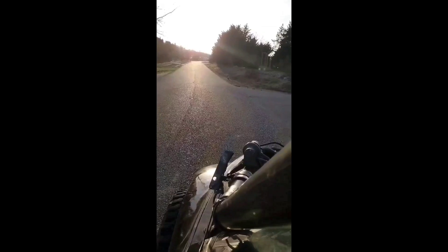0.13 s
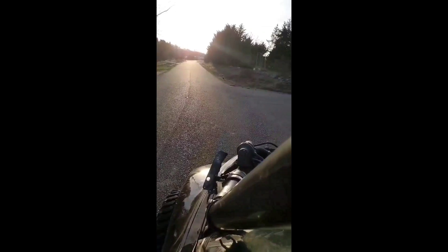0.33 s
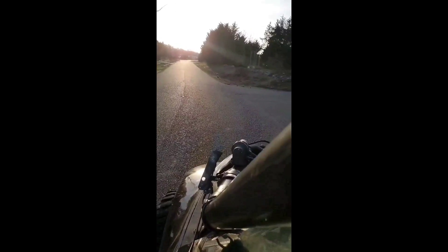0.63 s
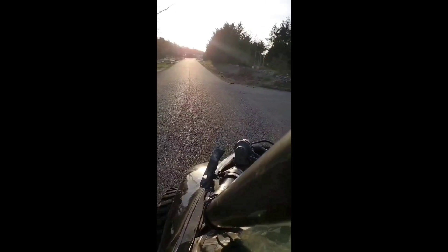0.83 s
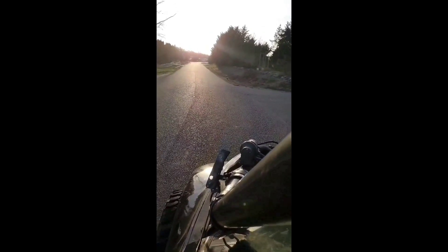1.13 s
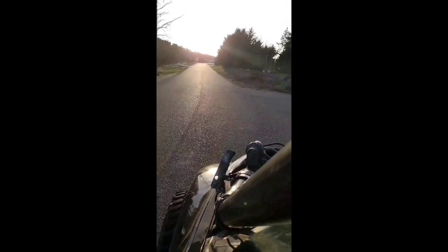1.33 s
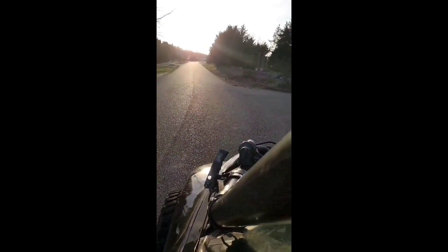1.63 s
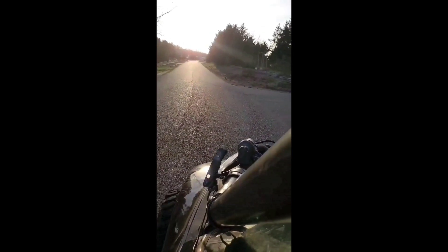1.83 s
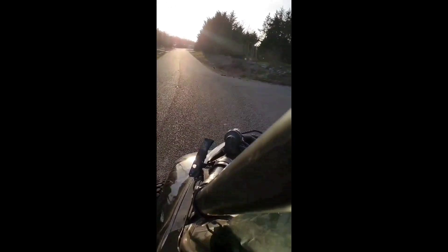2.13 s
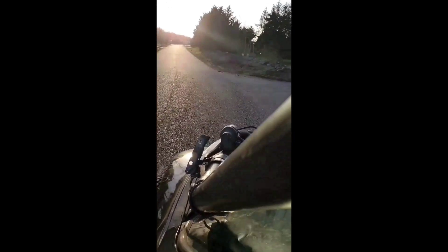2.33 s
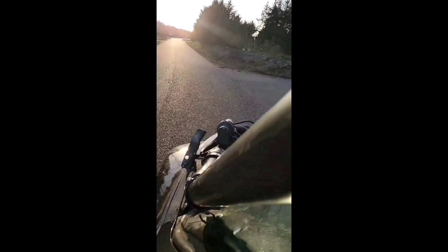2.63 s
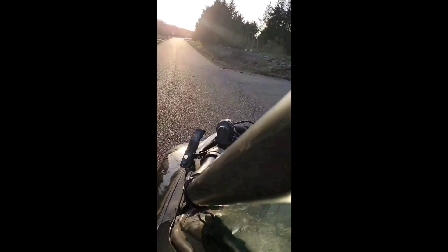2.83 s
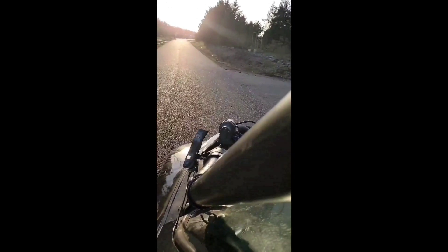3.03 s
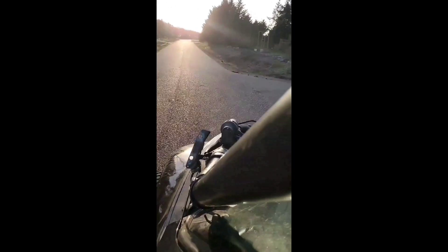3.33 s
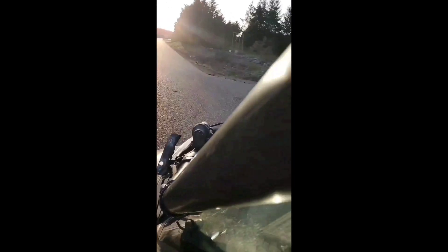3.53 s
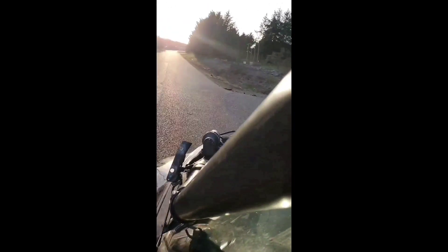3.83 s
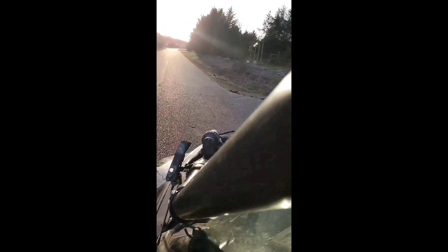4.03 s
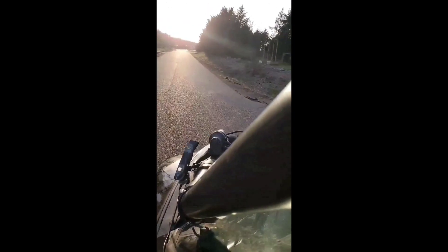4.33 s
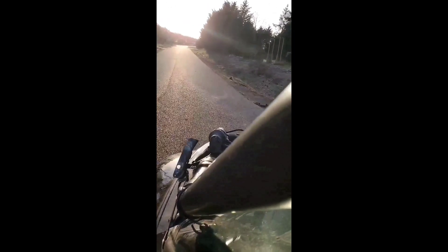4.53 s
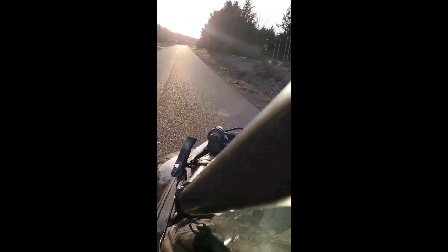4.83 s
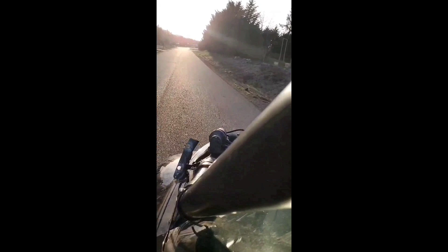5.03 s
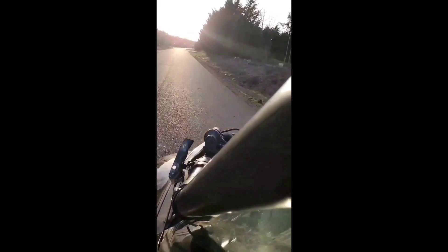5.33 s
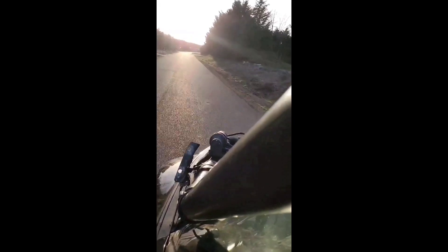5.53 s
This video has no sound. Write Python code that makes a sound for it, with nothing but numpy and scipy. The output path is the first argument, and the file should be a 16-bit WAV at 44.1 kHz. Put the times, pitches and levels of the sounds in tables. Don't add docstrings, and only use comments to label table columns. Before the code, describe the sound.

A close, dry outdoor microphone beside a small turbocharged engine. Quiet, slightly limping idle thuds give way to a sharp throttle opening, then uneven revs with spitting gas and tinny panel buzz. A faint whine slides steadily upward throughout. In the last second and a half the exhaust tightens into a rising drone, hiss dips briefly and returns, ending at full pull.

```python
import sys
import numpy as np
from scipy import signal
from scipy.fft import rfft, irfft, next_fast_len
from scipy.io import wavfile
from scipy.ndimage import uniform_filter1d, map_coordinates

SR = 44100
rng = np.random.default_rng(int(sys.argv[2]) if len(sys.argv) > 2 else 0)


def bounce(signal):
    frames = np.transpose(np.atleast_2d(signal))
    limited = np.clip(frames, -1, 1)
    pcm = np.round(limited * 32767).astype(np.int16)
    wavfile.write(sys.argv[1], SR, pcm)


def makeup_ratio(level_db):
    decades = np.asarray(level_db, float) / 20
    return 10 ** decades


N = 251370

# (time [s], puff level [dB])
THROTTLE = [(0, -48), (.22, -42.5), (1.03, -43), (1.15, -31.5), (1.18, -26), (1.36, -30), (1.64, -33),
            (1.85, -29.5), (1.9, -27), (2.1, -23.5), (2.5, -26), (2.95, -23), (4.21, -25.5), (4.48, -26.5),
            (4.72, -23.5), (5.0, -23.5), (5.3, -30.5), (5.7, -23.5)]


def unit(x):
    return x / np.sqrt(np.mean(x ** 2) + 1e-20)


def steady(x, span_s):
    power = np.abs(uniform_filter1d(x ** 2, size=int(span_s * SR)))
    return x / np.sqrt(power + 1e-12)


def curves(rows):
    s, *cols = np.transpose(rows)
    return [np.interp(np.arange(N) / SR, s, c) for c in cols]


def wobble(rate):
    knots = rng.standard_normal(int(N * rate / SR) + 4)
    return map_coordinates(knots, [np.arange(N) * rate / SR])


def filtered(x, response):
    m = next_fast_len(N + SR // 2)
    return irfft(rfft(x, m) * response(np.fft.rfftfreq(m, 1 / SR)), m)[..., :N]


def band(x, order, edges_hz):
    return signal.sosfilt(signal.butter(order, edges_hz, "band", fs=SR, output="sos"), x)


def mode(hz, centre, width, db):
    return makeup_ratio(db) * 1j * hz * width / (centre * centre - hz * hz + 1j * hz * width)


def resonant(x, modes):
    return filtered(x, lambda hz: sum((-1) ** k * mode(hz, *m) for k, m in enumerate(modes)))


def gain(points, hz):
    f, db = np.transpose(points)
    return makeup_ratio(np.interp(np.log(hz + 1), np.log(f), db))


def causal(x, points):
    cepstrum = irfft(np.log(gain(points, np.fft.rfftfreq(2 ** 15, 1 / SR)) + 1e-6))
    cepstrum[1:2 ** 14] *= 2
    cepstrum[2 ** 14 + 1:] = 0
    impulse = irfft(np.exp(rfft(cepstrum)))[:SR // 4]
    return signal.fftconvolve(x, impulse)[:N]


def revs():
    # (time [s], turns per second [Hz])
    crank_speed = [(0, 40.55), (.78, 37.34), (1, 38.36), (1.27, 56.76), (1.47, 55.8), (1.88, 39.73),
                   (2.33, 53.84), (2.67, 48.31), (2.93, 47.86), (3.29, 51.75), (3.76, 45.63), (3.91, 57.45),
                   (4.08, 56.82), (4.22, 61.82), (4.97, 79.97), (5.04, 85.33), (5.24, 87.45), (5.7, 103.08)]
    flywheel_s = .105
    return uniform_filter1d(curves(crank_speed)[0], size=int(flywheel_s * SR), mode="nearest")


def by_revs():
    # (turns per second [Hz], leak under the puffs [dB], intake [dB],
    # upper orders [dB], silencer ring [dB])
    balance = [(39.5, -45, -50, -9, -10), (64, -16, -50.5, -3, -10.5), (67, -20, -44, 2.5, -10.5),
               (81.4, -3, -38, 7.5, -2), (101, -4, -34.5, 4, -22)]
    idle_db = (43, 7.5, -6, 5.5)
    idle = np.interp(curves(THROTTLE)[0], (-43, -33), (1, 0))
    hz, *cols = np.transpose(balance)
    return [np.interp(revs(), hz, c) + idle * db for c, db in zip(cols, idle_db)]


def each_turn(turn):
    return rng.standard_normal(N // 100)[np.floor(turn + 1.5).astype(int)]


def pulses(turn, delay_s, jitter_s, size):
    limp_s = .00008
    at = np.interp(np.arange(int(turn[-1]) + 1), turn, np.arange(N))
    delay = np.broadcast_to(delay_s, N)[at.astype(int)]
    limp = limp_s * (-1) ** np.arange(len(at))
    jitter = jitter_s * rng.standard_normal(N // 100)[:len(at)]
    at = at + SR * (delay + limp + jitter)
    index = np.clip(at.astype(int), 0, N - 1)
    return np.bincount(index, size[index], N)


def alternation(turn):
    return np.cos(np.pi * np.round(turn))


def pipe_note(turn, pull, back_db):
    # (frequency [Hz], level [dB])
    pipe = [(15, -105), (40, -12.5), (56, -9), (100, -7), (150, -3), (195, -9), (260, -10), (330, -14),
            (400, -18), (500, -20.5), (570, -56.5), (900, -76)]
    # (frequency [Hz], level [dB])
    backwave = [(30, -37.5), (100, -0.5), (250, -2.5), (400, 2.5), (600, -5.5)]
    # (turns per second [Hz], round trip [s])
    trip = [(55, .0074), (85, .0061)]
    blow_s = .0066
    back_turn = .53
    trip_s = np.interp(revs(), *np.transpose(trip))
    echo_db = np.interp(pull, (0, 1), (-4.5, -15))
    late_db = np.interp(pull, (0, 1), (-14.5, -30))
    odd_turn = alternation(turn)
    blows = pulses(turn, blow_s, .00008, makeup_ratio(.7 * wobble(50) + .5 * odd_turn))
    echo = pulses(turn, blow_s + trip_s, .0001, makeup_ratio(echo_db + wobble(50) - odd_turn))
    late = pulses(turn, blow_s + 2 * trip_s, .00015, makeup_ratio(late_db + 1.5 * wobble(50) + odd_turn))
    back = pulses(turn, blow_s + back_turn / revs(), .0001, makeup_ratio(back_db + wobble(50)))
    returns = filtered(late - echo + back, lambda hz: gain(backwave, hz))
    return -unit(causal((blows + returns)[::-1], pipe)[::-1])


def silencer_ring(turn):
    # (centre [Hz], width [Hz], level [dB])
    silencer = [(290, 630, -18), (345, 34.5, 0), (403.4, 47, -10), (496.4, 21, -10)]
    gulp_size = makeup_ratio(4.5 * alternation(turn) + 2 * wobble(40))
    gulps = pulses(turn - .15, 0, .0004, gulp_size) + .012 * rng.standard_normal(N)
    return band(resonant(gulps, silencer), 8, [200, 520])


def exhaust(turn):
    # (time [s], note level [dB], pull on the wheels [0-1], back pulse [dB])
    loading = [(0, -16, 0.14, -18), (.3, -11, 0.5, -16), (.9, -12, 0.2, -20), (1.1, -9.5, 0, -26),
               (1.5, -11, 0, -14), (3.7, -11, 0.18, -4), (3.95, -10, 0.2, -10), (4.4, -9, 1, -1),
               (4.65, -11.5, 1, -28), (4.85, -11.5, 0.8, -31), (5, -10, 0.6, -30), (5.7, -11, 1, -29)]
    note_db, pull, back_db = curves(loading)
    bite_db, ring_db = by_revs()[2:]
    note = pipe_note(turn, pull, back_db)
    upper = filtered(note, lambda hz: 1 / (1 + (390 / (hz + 1)) ** 12))
    middle = filtered(note, lambda hz: 1 / (1 + (198 / (hz + 1)) ** 6))
    note = note + (makeup_ratio(bite_db) - 1) * upper + (makeup_ratio(7.5 * pull) - 1) * middle
    ring = makeup_ratio(ring_db) * steady(silencer_ring(turn), 0.29)
    return makeup_ratio(note_db) * steady(steady(note, 0.1) + ring, 0.16)


def puff_gate(turn):
    angle = turn - np.round(turn) + .01 + .02 * each_turn(turn)
    round_turn = .05
    away = np.hypot(angle, round_turn) - round_turn
    rise = makeup_ratio(-140 * away)
    tail = makeup_ratio(-16 - 35 * angle) * np.clip(angle / .1, 0, 1)
    shape = np.where(angle < 0, rise, makeup_ratio(-105 * away) + tail)
    return steady(makeup_ratio(1.96 * each_turn(turn)) * shape, 0.26)


def tinwork(gate, puff_db):
    # (centre [Hz], width [Hz], level [dB])
    panels = [(657, 55, -1), (849, 91, 3), (1190, 220, 1.5), (1368, 170, 4), (1356, 170, 7),
              (1645, 140, -0.5), (1896, 178, -1), (2730, 440, -3.5)]
    low_pass = signal.butter(2, 1500, fs=SR, output="sos")
    hum = signal.sosfilt(low_pass, rng.standard_normal(N))
    knocks = makeup_ratio(puff_db + 32.5) * np.roll(gate, shift=-80) * rng.standard_normal(N)
    looseness = makeup_ratio(1.84 * wobble(150) + 1.3 * wobble(12))
    tin = resonant((3.27 * hum + knocks) * looseness, panels)
    return steady(band(tin, 3, [610, 3200]), 0.148)


def gas(turn):
    # (centre [Hz], width [Hz], level [dB])
    hiss = [(2035, 97, 3.5), (3560, 530, -9), (4584, 143, -5), (5320, 370, -7), (6540, 280, -12.5),
            (7220, 390, -13), (9290, 630, -10), (11554, 426, -0.5), (13500, 1420, -7)]
    throttle_db, = curves(THROTTLE)
    puff_db = throttle_db + 1.77 * wobble(20)
    leak = makeup_ratio(by_revs()[0] + 4 * wobble(10))
    clatter_db = -24.5 + 0.13 * (throttle_db + 21) + wobble(8.6)
    gate = puff_gate(turn)
    gust = makeup_ratio(0.89 * wobble(700)) * rng.standard_normal((2, N))
    high = resonant((gate + leak) * gust[0], hiss[5:])
    low = resonant((gate ** .7 + leak + .04) * gust[1], hiss[:5])
    jet = steady(high + low, 0.063)
    return makeup_ratio(puff_db) * jet + makeup_ratio(clatter_db) * tinwork(gate, puff_db)


def intake(turn):
    # (frequency [Hz], density [dB per Hz])
    suction = [(1650, -31), (2800, 15), (3100, 15), (3300, 9), (3660, 16), (3980, 15), (4530, 18.5),
               (4890, 15.5), (6140, 13), (7390, 8.5), (7750, -7), (9210, 16), (10000, 0), (11500, -38),
               (14500, -77)]
    level_db = by_revs()[1]
    swell = makeup_ratio(2 * np.cos(4 * np.pi * turn) + 2 * wobble(120))
    hiss = filtered(rng.standard_normal(N), lambda hz: gain(suction, hz))
    return makeup_ratio(level_db) * unit(swell * hiss)


def road():
    # (frequency [Hz], density [dB per Hz])
    spectrum = [(15, -45), (32, -9), (55, -3.5), (110, -6), (250, -15), (450, -11.5), (560, -20),
                (1500, -37.5), (4000, -120)]
    road_db, = curves([(2.9, -28.5), (4.45, -17)])
    rumble = filtered(rng.standard_normal(N), lambda hz: gain(spectrum, hz))
    return makeup_ratio(road_db) * unit(rumble * makeup_ratio(2.6 * wobble(7)))


def turbo(turn):
    # (time [s], shaft speed [Hz], whine level [dB])
    shaft = [(0, 800, -60), (.9, 930, -55), (1.5, 1115, -44), (1.9, 1215, -43), (2, 1285, -33),
             (2.3, 1605, -38), (2.5, 1750, -44), (2.66, 1890, -37), (2.9, 2000, -33), (3.4, 2380, -43),
             (4, 2775, -40), (4.6, 3160, -41), (5.1, 3820, -40), (5.25, 4200, -52), (5.41, 4590, -34),
             (5.52, 4740, -41), (5.58, 5020, -34), (5.7, 5380, -31)]
    # (shaft speed [Hz], phase swing [rad])
    kick = [(1300, .7), (2100, 1.1), (4000, 1.25), (4700, .8), (5000, 2.1)]
    # (centre [Hz], width [Hz], level [dB])
    duct = [(1335, 420, 2), (2010, 540, 5.5), (4630, 120, 5)]
    shaft_hz, whine_db = curves(shaft)
    kick_rad = np.interp(shaft_hz, *np.transpose(kick))
    overtone_db = -2 - ((shaft_hz - 2830) / 70) ** 2
    crank = 2 * np.pi * turn
    spin = 2 * np.pi * np.cumsum(shaft_hz + 20 * wobble(60)) / SR
    phase = spin + kick_rad * np.sin(crank + .5)
    level = makeup_ratio(whine_db + 3 + 3 * wobble(90)) * (1 + .7 * np.cos(crank - 1.2))
    whine = level * (np.sin(phase) + makeup_ratio(overtone_db) * np.sin(2 * phase))
    return whine + filtered(whine, lambda hz: sum(mode(hz, *m) for m in duct))


def scene():
    start_turn = .39
    turn = start_turn + np.cumsum(revs()) / SR
    mix = exhaust(turn) + gas(turn) + intake(turn) + road() + turbo(turn)
    return np.array([mix, mix])


def top_cut(x):
    return signal.sosfilt(signal.butter(12, 15740, fs=SR, output="sos"), x)


def record(dry):
    x = filtered(dry, lambda hz: 1 / (1 + (hz / 14820) ** 60))
    x = x / (1 + np.abs(x / .99) ** 8) ** (1 / 8)
    bright = signal.sosfilt(signal.butter(4, 600, "high", fs=SR, output="sos"), x[0])
    side = makeup_ratio(-15) * np.roll(bright, 90) * (wobble(30) > 1.1)
    return top_cut(x + np.array([side, -side]))


dry = scene()
out = record(dry)
bounce(out)
```